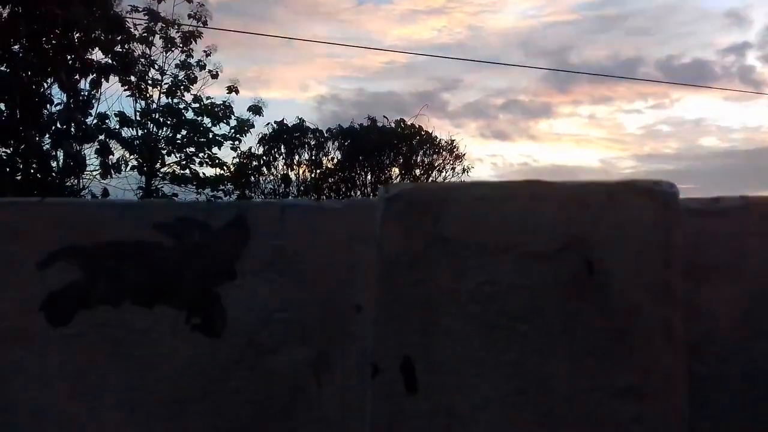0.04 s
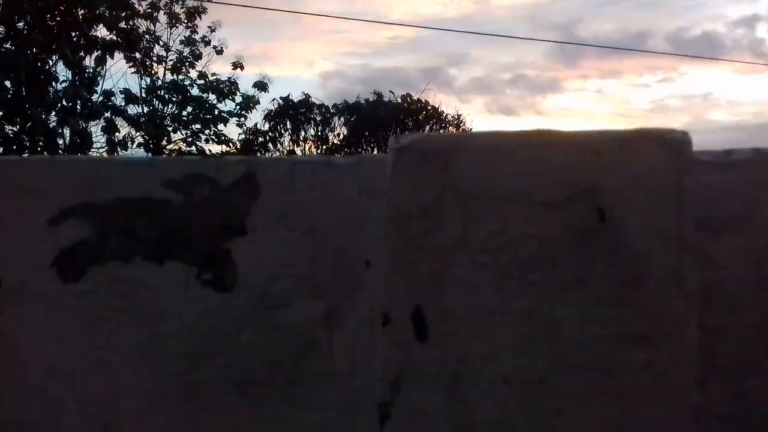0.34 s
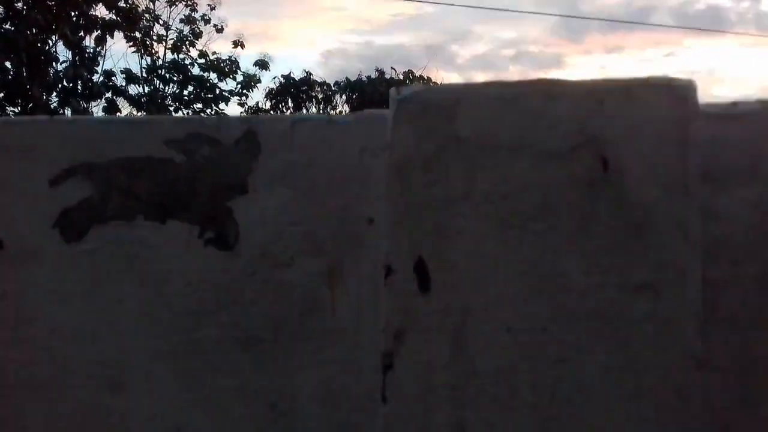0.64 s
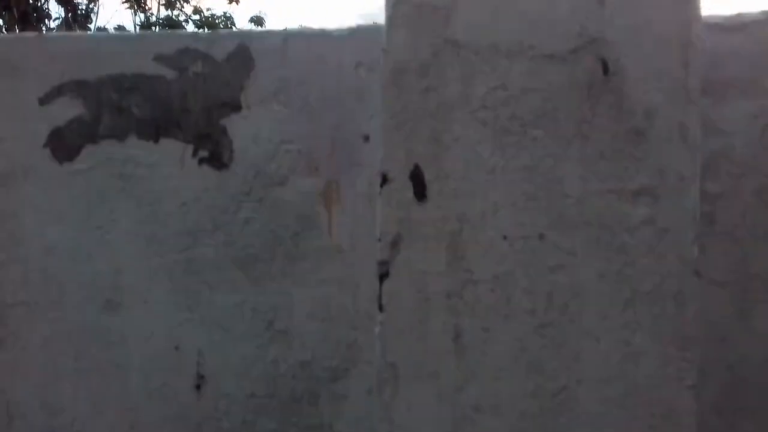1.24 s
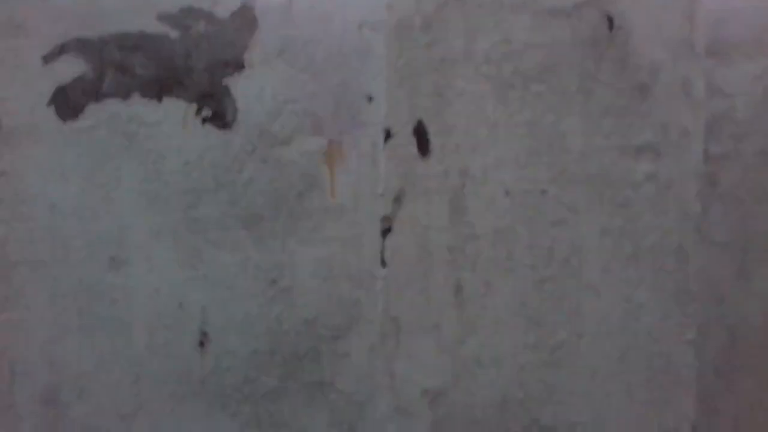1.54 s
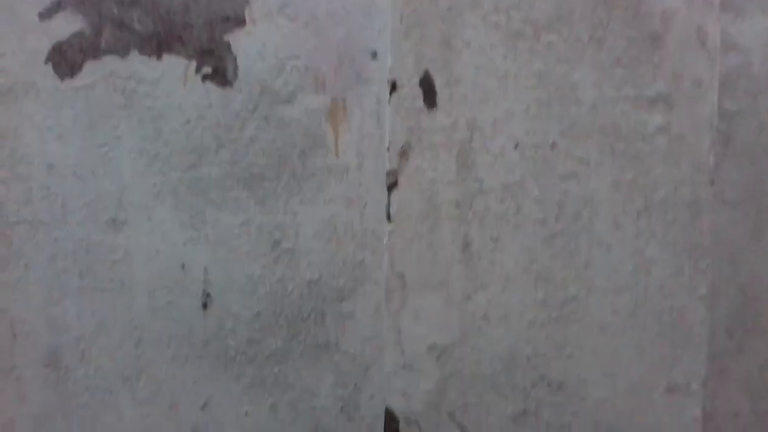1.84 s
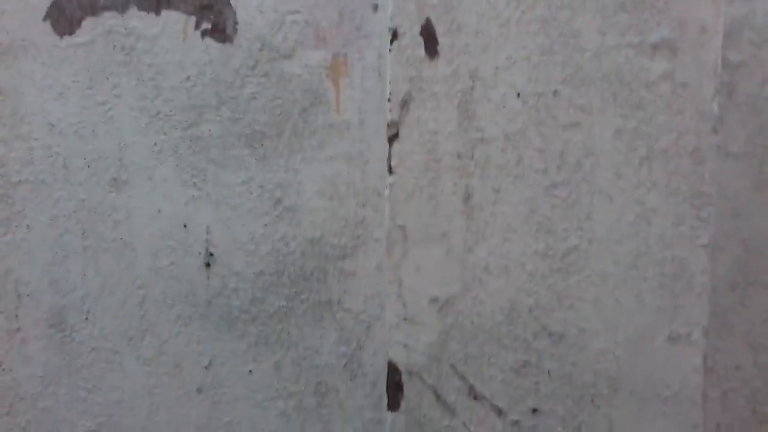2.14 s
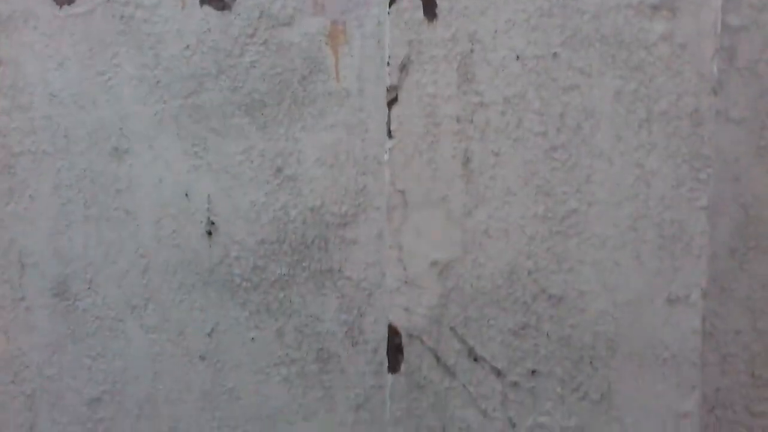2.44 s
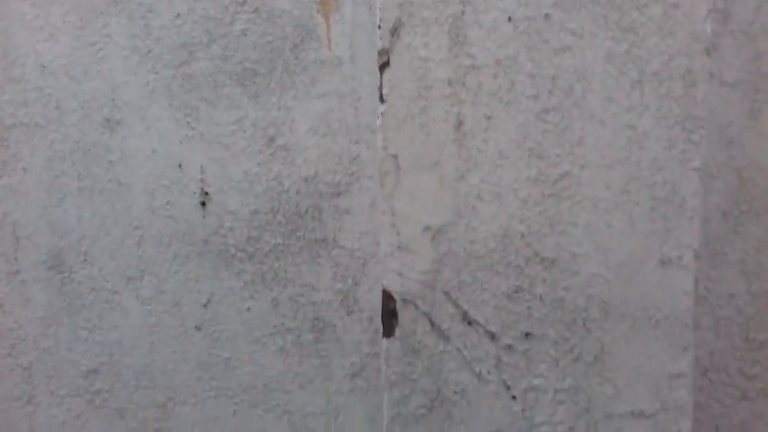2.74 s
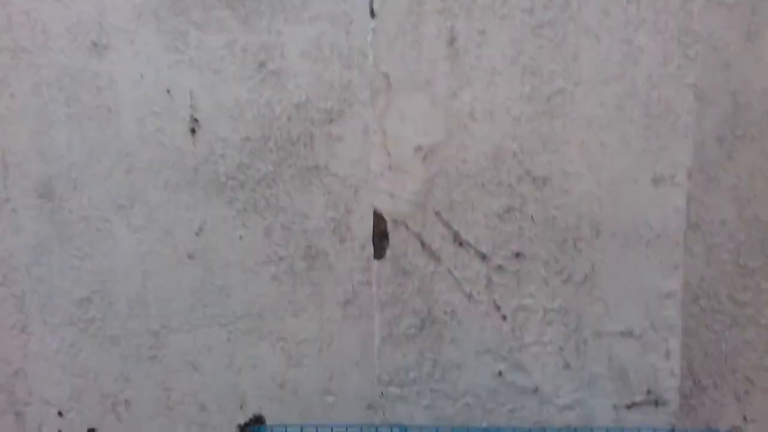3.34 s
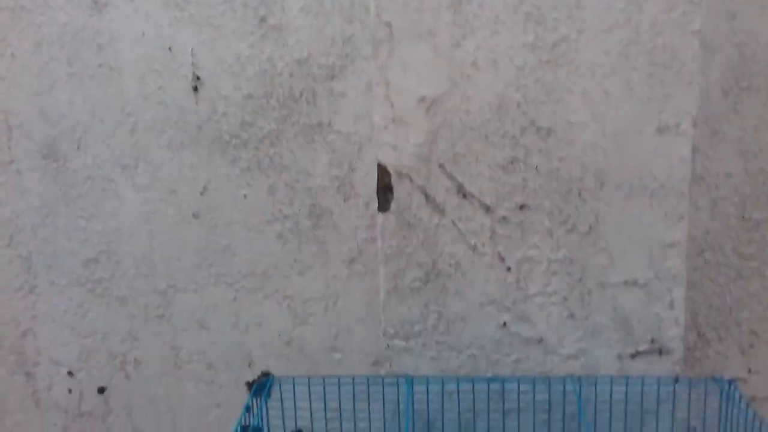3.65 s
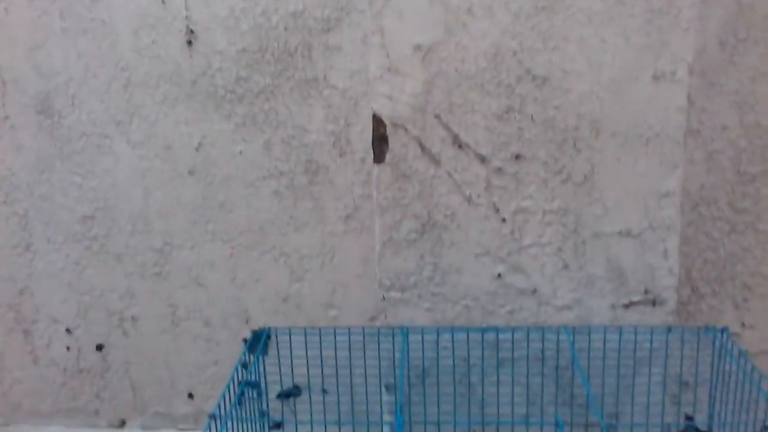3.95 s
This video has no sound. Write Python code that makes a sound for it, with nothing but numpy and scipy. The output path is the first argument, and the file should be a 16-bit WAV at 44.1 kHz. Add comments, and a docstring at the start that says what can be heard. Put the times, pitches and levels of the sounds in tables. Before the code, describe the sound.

A guinea pig squeals over and over in its cage outdoors while crickets hiss.

```python
"""A guinea pig squeals again and again from its cage beside a garden wall at dusk.
Most squeals dip to a low, reedy hum, then sweep upward and thin to a whistle as the harmonics fade.
The cage wires tick and the bedding rustles. Crickets hiss all around, a near one chirps high above
them with its wing strokes, an engine hums far off and a thin whine sets in at the end."""
import sys
import numpy as np
from scipy import signal
from scipy.fft import rfft, irfft
from scipy.io import wavfile
from scipy.ndimage import uniform_filter1d

SR = 44100
rng = np.random.default_rng(int(sys.argv[2]) if len(sys.argv) > 2 else 0)


def generate_wav(sig):
    """Save sig (samples, or channels by samples) to the path in sys.argv[1] as 16-bit PCM at SR."""
    pcm = np.round(np.clip(np.atleast_2d(sig).T, -1, 1) * 32767).astype(np.int16)
    wavfile.write(sys.argv[1], SR, pcm)


N = 176400
TIME, FREQ = np.arange(N) / SR, np.fft.rfftfreq(N, 1 / SR)


def amp(db):
    """Amplitude ratio of a level in decibels."""
    return 10 ** (np.asarray(db) / 20)


def unit(x):
    """Normalisation to rms 1."""
    return x / np.sqrt(np.mean(x ** 2) + 1e-20)


def curve(rows, t, column=1):
    """Linear interpolation of one column over time."""
    rows = np.array(rows, float)
    return np.interp(t, rows[:, 0], rows[:, column])


def colour(points, hz):
    """Gain of a spectral envelope, interpolated in dB over log frequency."""
    f, db = np.transpose(points)
    return amp(np.interp(np.log(hz + 1), np.log(f), db))


def noise(points):
    """White noise filtered by a spectral envelope, at rms 1."""
    return unit(irfft(rfft(rng.standard_normal(N)) * colour(points, FREQ), N))


def wander(rate_hz):
    """Random modulation: low-pass noise of rms 1."""
    return unit(irfft(rfft(rng.standard_normal(N)) / (1 + (FREQ / rate_hz) ** 4) * (FREQ > 0), N))


def phase(hz):
    """Phase as the integral of frequency."""
    return 2 * np.pi * np.cumsum(hz) / SR


def gate(t, start, end, edge):
    """Trapezoidal envelope from start to end."""
    return np.clip((t - start) / edge + .5, 0, 1) * np.clip((end - t) / edge + .5, 0, 1)


def guinea_pig():
    """Source and filter: the throat shapes gliding harmonics, reedy when low, a whistle when high."""
    # One list per squeal. Each row: time in seconds, pitch in Hz, level in dB.
    squeals = [
        [(0.0, 2144, -37.5), (0.082, 3010, -48.5)],
        [(0.23, 649.6, -39.5), (0.275, 643, -40), (0.292, 833, -43), (0.306, 1160, -39), (0.34, 1794, -37.5),
         (0.352, 2015, -51), (0.366, 2340, -41), (0.405, 2740, -55)],
        [(0.507, 892, -47), (0.522, 636, -40), (0.55, 591, -39.5), (0.575, 670, -42), (0.597, 1394, -41),
         (0.611, 1232, -36.5), (0.625, 1756, -40.5), (0.634, 1700, -51)],
        [(0.76, 716, -57), (0.782, 612, -41), (0.815, 602, -45), (0.84, 685, -44.5), (0.857, 981, -45.5),
         (0.87, 1477, -34.5), (0.884, 1400, -40.5), (0.905, 2220, -44.5)],
        [(1.03, 893, -60), (1.052, 625.4, -43.5), (1.085, 603, -41), (1.122, 810, -48.5), (1.138, 1180, -44),
         (1.153, 1046, -40.5), (1.172, 1360, -40), (1.192, 1480, -50), (1.22, 2450, -47), (1.235, 2360, -46)],
        [(1.337, 1158, -45), (1.356, 625, -41.5), (1.395, 616, -39.5), (1.415, 717, -48), (1.441, 1208, -36.5),
         (1.461, 1057, -39), (1.48, 1350, -38.5), (1.49, 1210, -48)],
        [(1.675, 620, -44), (1.708, 612, -44), (1.727, 791, -47), (1.738, 1262, -38), (1.752, 1455, -45),
         (1.766, 1935, -46), (1.778, 1870, -55)],
        [(1.903, 756, -55), (1.918, 619.6, -40.5), (1.948, 630, -40.5), (1.968, 833, -44), (1.985, 1280, -36.5),
         (2.005, 1370, -44), (2.058, 2370, -38), (2.1, 2810, -60)],
        [(2.207, 973, -52), (2.22, 617, -40.5), (2.265, 640, -40), (2.312, 1053, -39), (2.322, 1190, -32.5),
         (2.33, 1384, -42), (2.35, 1392, -38), (2.375, 1865, -40.5), (2.392, 1980, -61)],
        [(2.475, 787, -41), (2.495, 671, -41), (2.52, 635, -38.5), (2.548, 720, -32), (2.58, 880, -41.5),
         (2.59, 1170, -31), (2.602, 930, -72)],
        [(2.715, 711, -47), (2.735, 638, -44.5), (2.76, 655, -39.5), (2.779, 823, -46.5), (2.788, 1207, -31.5),
         (2.798, 1100, -44)],
        [(2.915, 750, -52), (2.932, 625, -44), (2.962, 612, -43.5), (2.985, 697, -41.5), (2.996, 800, -51)],
        [(3.33, 596, -56), (3.365, 660.6, -41), (3.378, 865, -48), (3.387, 1196, -30), (3.398, 1390, -56)],
        [(3.52, 720, -51), (3.537, 602, -48), (3.57, 648, -41), (3.586, 870, -47.5), (3.595, 1160, -34),
         (3.605, 1120, -45)],
        [(3.728, 690, -45), (3.745, 568, -44.5), (3.775, 616, -50), (3.787, 793, -39), (3.803, 795, -40),
         (3.809, 1030, -36.5), (3.817, 1024, -43)],
        [(3.95, 673, -45.5), (4.0, 629, -43.5)],
    ]
    # Each row: start in seconds, length in seconds, pitch in Hz, level in dB.
    yips = [(0.185, 0.0087, 1266, -32)]
    # The voice grows nasal. Each row: time in seconds, gain of the low fundamental in dB.
    chest = [(1.1, 4), (1.4, 0), (1.9, 2), (2.3, -7), (3, -12)]
    # Each row: centre in seconds, half length in seconds, relative pitch jitter.
    hoarse_spells = [(2.347, .02, .14)]
    # Each entry: gain of a harmonic in dB before filtering, fundamental first.
    harmonics_db = [0, 0, -9.5, -20, -17, -16, -19]
    # A throat resonance lifts the whistle's overtone. Each row: frequency in Hz, gain in dB.
    resonance = [(2200, -19), (3200, -18), (3900, -14), (4650, -5), (5000, -7), (6000, -16)]
    # Air rushing with the voice. Each row: frequency in Hz, gain in dB.
    air_spectrum = [(200, -20), (500, -7), (1400, -1), (4000, -8), (11000, -32)]
    chest_top_hz, throat_top_hz, air_top_hz = 1138, 6560, 825
    edge_s, wobble_hz = .005, 140
    out, air = np.zeros(N), noise(air_spectrum) * amp(-14)
    hoarse = sum(depth * np.exp(-((TIME - s) / half) ** 2) for s, half, depth in hoarse_spells)
    jitter = .007 * wander(wobble_hz) + hoarse * wander(600)
    shimmer = 1 + .14 * wander(wobble_hz) + 5 * hoarse * wander(600)
    rasp, crack = .025 * wander(2 * wobble_hz), .35 * wander(wobble_hz / 2)
    k = np.arange(len(harmonics_db))[:, None] + 1
    for call in squeals:
        opening = gate(TIME, call[0][0], call[-1][0], edge_s)
        on = opening > 0
        t = TIME[on]
        hz = uniform_filter1d(curve(call, t), size=260)
        low = np.clip((chest_top_hz - hz) / 400, 0, 1)  # share of the low register
        high = 1 - low
        partials = amp(harmonics_db)[:, None] / (1 + (k * hz / throat_top_hz) ** 8)
        partials[0] *= amp(curve(chest, t) * low)
        partials[1:] *= colour(resonance, 2 * hz) ** high
        partials[2:] *= low ** 2  # the upper harmonics fade first
        partials /= np.sqrt((partials ** 2).sum(0) / 2)
        rough_hz = hz * (1 + jitter[on] + high * rasp[on])
        voice = (partials * np.sin(k * phase(rough_hz))).sum(0) * (shimmer[on] + high * crack[on])
        breath = air[on] * (1 + low) / 2 * np.minimum(air_top_hz / hz, 1)
        out[on] += opening[on] * amp(curve(call, t, column=2)) * (voice + breath)
    for start, length, hz, db in yips:
        voice = np.sqrt(2) * np.sin(phase(hz * (1 + jitter)))
        out += gate(TIME, start, start + length, edge_s / 2) * amp(db) * (voice + air)
    return out


def cage_wires():
    """Damped vibration: each tick is a broadband snap and a narrow ring, decaying exponentially."""
    # Each row: start in seconds, level in dB, ring frequency in Hz.
    ticks = [(0.476, -31.5, 7500), (0.607, -29.5, 7400), (0.6245, -22.5, 7200), (.899, -35, 4400),
             (1.0565, -38, 4200), (2.842, -38, 7400)]
    # Each row: frequency in Hz, gain in dB.
    snap_spectrum = [(500, -6.5), (8000, -5), (12500, -27)]
    rise_s, decay_s = .0017, .0029
    snap, ring = amp(-3) * noise(snap_spectrum), np.sqrt(2) * wander(550)
    out = np.zeros(N)
    for start, db, hz in ticks:
        envelope = np.clip((TIME - start) / rise_s, 0, 1) * np.exp(-abs(TIME - start) / decay_s)
        out += amp(db) * envelope * (snap + ring * np.sin(2 * np.pi * hz * TIME))
    return out


def bedding():
    """Friction noise: brief scuffs and soft shuffling share one grainy amplitude modulation."""
    # Each row: start in seconds, length in seconds, level in dB.
    scuffs = [(0.211, 0.019, -43), (0.892, 0.023, -42.5), (2.4918, 0.005, -31), (2.53, 0.044, -37.5),
              (2.621, 0.019, -32), (2.643, 0.0085, -33.5), (2.772, 0.0036, -40), (3.533, 0.0063, -40.5),
              (3.807, 0.01, -40)]
    # Each row: time in seconds, level in dB.
    shuffle_levels = [(.14, -50.5), (.22, -43.5), (.38, -47.5), (.5, -53), (2.44, -53.5), (2.52, -49.5),
                      (2.66, -41.5), (2.9, -55.5), (3.6, -62), (3.81, -43), (4, -48.5)]
    # Each row of both spectra: frequency in Hz, gain in dB.
    scuff_spectrum = [(150, -18), (450, 0.5), (4000, 3.5), (6500, 3.5), (11000, -18), (16000, -31)]
    shuffle_spectrum = [(120, -17.5), (400, 6.5), (1400, 5), (7000, -9.5), (12000, -33)]
    rise_s, fall_s = .0025, .0055
    envelope = np.zeros(N)
    for start, length, db in scuffs:
        rise = np.clip((TIME - start) / rise_s, 0, 1)
        envelope += amp(db) * rise * np.exp(-np.maximum(TIME - start - length, 0) / fall_s)
    grain = unit(amp(2 * wander(76)))
    scuffing = envelope * noise(scuff_spectrum)
    return grain * (scuffing + amp(curve(shuffle_levels, TIME)) * noise(shuffle_spectrum))


def near_cricket():
    """Stridulation: each chirp is a run of wing strokes, every stroke falling in pitch."""
    # Each entry: end of a chirp in seconds.
    chirp_ends = [0.534, 0.754, 1.02, 1.281, 1.57, 1.823, 2.089, 2.369, 2.646, 2.924, 3.201, 3.5, 3.759,
                  4.06]
    chirp_s, strokes_per_s, onset_s = .165, 97, .029
    top_hz, stroke_sag_hz, onset_sag_hz = 10220, 514, 620
    out, t = np.zeros(N), np.arange(int(chirp_s * SR)) / SR
    stroke = t * strokes_per_s % 1
    onset = np.exp(-t / onset_s)  # a chirp starts flat and soft
    jitter_hz = 170 * wander(400)
    for end in chirp_ends:
        at = int(end * SR) - len(t) + np.arange(len(t))
        hz = top_hz - stroke_sag_hz * stroke ** 2 - onset_sag_hz * onset + jitter_hz[at % N]
        chirp = unit(np.sin(np.pi * stroke) * (1 - .58 * onset) * np.sin(phase(hz)))
        out[at[at < N]] += amp(-60.5) * chirp[at < N]
    return out


def whine():
    """Random amplitude and frequency modulation make three partials rasp like a far brake."""
    # Each row: time in seconds, level in dB.
    levels = [(3.6, -60), (3.71, -46), (3.78, -48), (3.81, -58), (3.86, -58), (3.95, -43)]
    # Each row: frequency in Hz, relative level in dB.
    partials = [(3175, 2), (3565, -13), (6350, -17)]
    tone = np.zeros(N)
    for hz, db in partials:
        flutter = amp(db + 2 * wander(22)) * (1 + .39 * wander(110))
        tone += flutter * np.sin(phase(hz * (1 + .0043 * wander(110))))
    return np.sqrt(2) * tone * amp(curve(levels, TIME)) * (TIME > levels[0][0])


def insect_chorus():
    """Incoherent summation: far crickets merge into swelling hiss; one insect trills above them."""
    # Each row: frequency in Hz, relative spectral density in dB.
    spectrum = [(4200, -26.5), (4550, -16), (4950, -3), (5200, 3), (5420, 0.5), (5700, -8.5), (6080, -17.5),
                (6380, -8.5), (6950, -7), (7500, -20.5), (8100, -79), (9100, -26), (9900, -24.5),
                (10700, -45.5)]
    trill_hz = 8640
    hiss = noise(spectrum) * amp(-43 + .95 * wander(4.7) + .7 * wander(100))
    trill = unit(wander(190) * np.sin(2 * np.pi * trill_hz * TIME))
    return hiss + amp(-66.5) * trill


def street():
    """A far engine's modulated tone sinks in pitch over the broadband noise of the evening air."""
    # Each row: time in seconds, pitch in Hz, level in dB.
    engine = [(0, 173.3, -60), (1.25, 169.9, -59), (2.6, 135, -78), (3.25, 125.9, -61), (4, 121.6, -68)]
    # Each row: frequency in Hz, relative spectral density in dB.
    air_spectrum = [(22, -40), (55, -9.5), (120, 3.5), (220, -1.5), (500, 0.5), (1250, -4.5), (3200, -14),
                    (8000, -15), (12000, -33)]
    hz = curve(engine, TIME) * (1 + .0328 * wander(13.8))
    hum = unit(np.sin(phase(hz)) * (1 + .7 * wander(12.5)))
    air = noise(air_spectrum) * amp(-52 + 1.07 * wander(12))
    return air + hum * amp(curve(engine, TIME, column=2))


def yard(x):
    """Reverberation: convolution adds a short open-air tail to the direct sound."""
    t60_s, tail_db = .28, -10
    t = TIME[:SR // 2]
    tail = rng.standard_normal(len(t)) * amp(-60 * t / t60_s) * (t > .008)
    response = amp(tail_db) * tail / np.linalg.norm(tail)
    response[0] = 1
    return signal.fftconvolve(x, response)[:N]


def scene():
    """Mid-side stereo: nearly all is central; an uncorrelated background widens the treble a little."""
    # Each row: frequency in Hz, gain of the side signal in dB.
    spread = [(250, -21.5), (1000, -29.5), (4500, -39.5), (8500, -8.5)]
    mid = yard(guinea_pig() + cage_wires() + bedding() + near_cricket() + whine())
    mid += insect_chorus() + street()
    side = irfft(rfft(insect_chorus() + street()) * colour(spread, FREQ), N)
    return np.array([mid + side, mid - side])


def record(dry):
    """Band limiting: a linear-phase low-pass filter removes the highest treble."""
    lowpass = signal.firwin(511, cutoff=15720, window=("kaiser", 9), fs=SR)
    return signal.oaconvolve(dry, lowpass[None], "same")


dry = scene()
out = record(dry)
generate_wav(out)
```